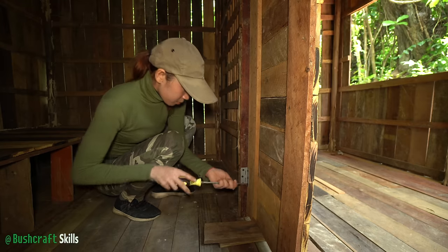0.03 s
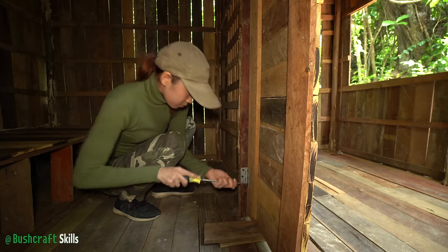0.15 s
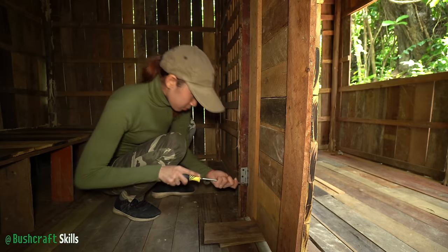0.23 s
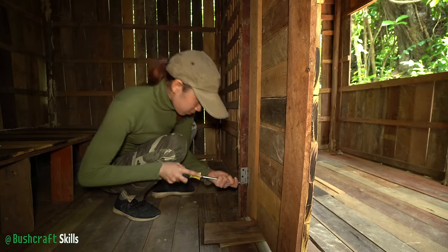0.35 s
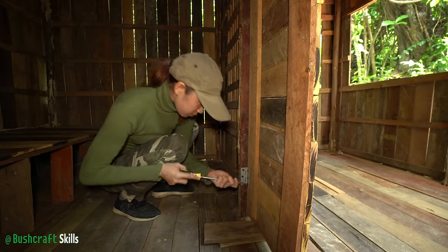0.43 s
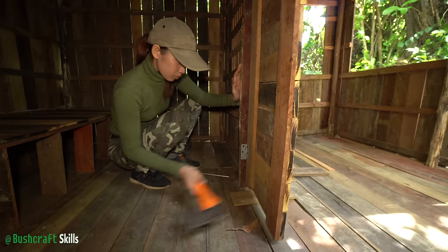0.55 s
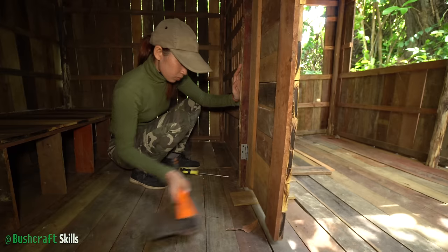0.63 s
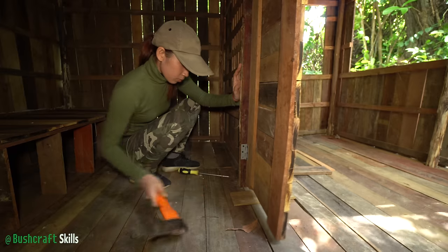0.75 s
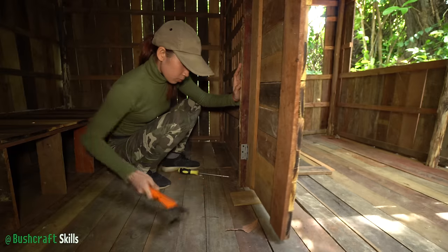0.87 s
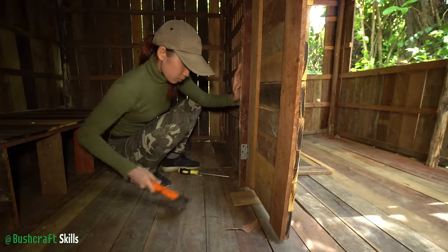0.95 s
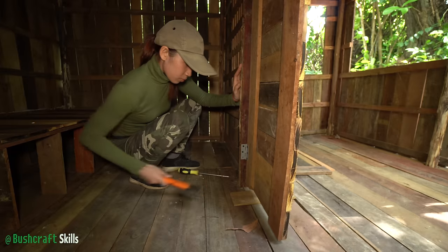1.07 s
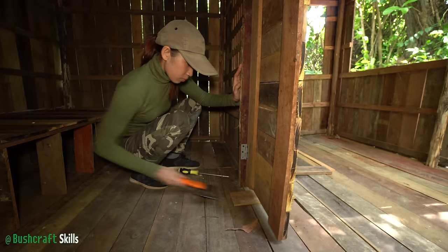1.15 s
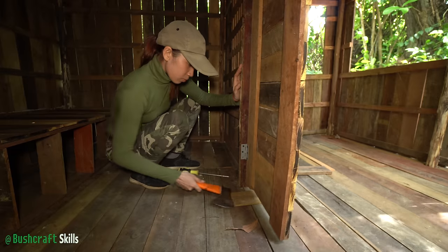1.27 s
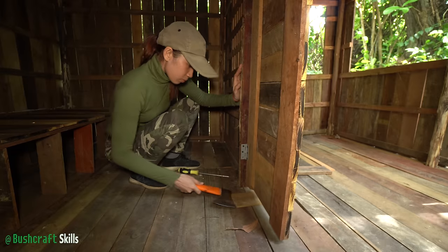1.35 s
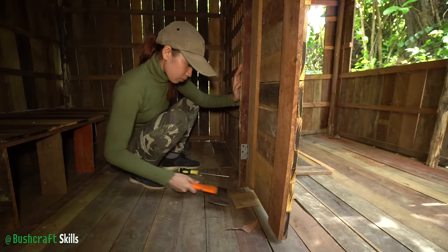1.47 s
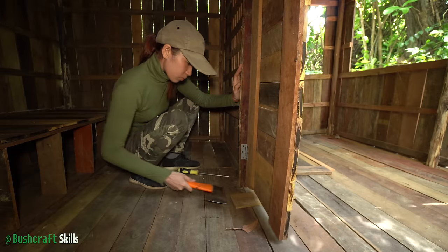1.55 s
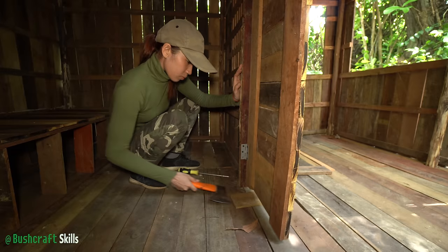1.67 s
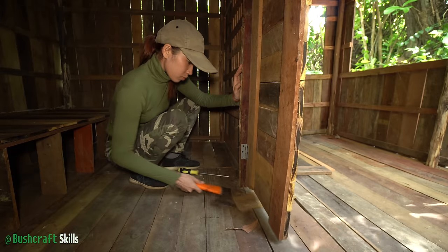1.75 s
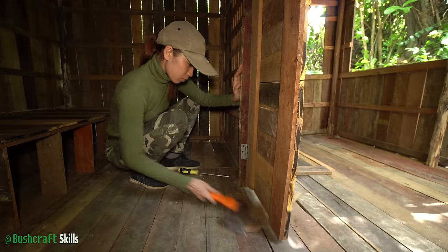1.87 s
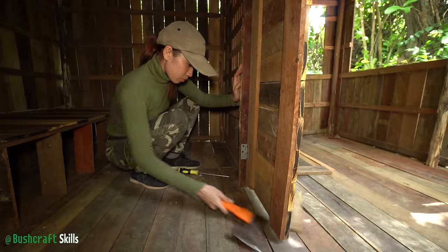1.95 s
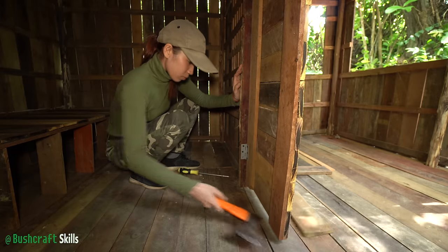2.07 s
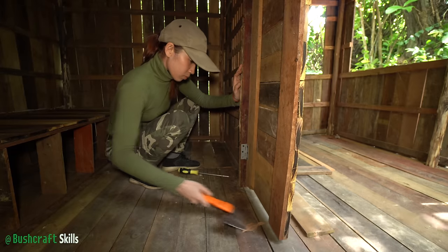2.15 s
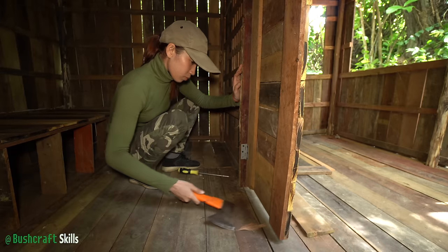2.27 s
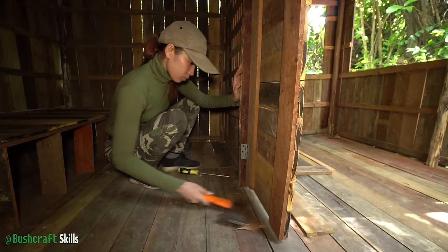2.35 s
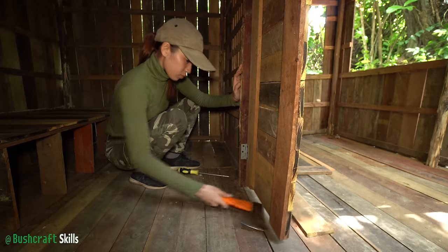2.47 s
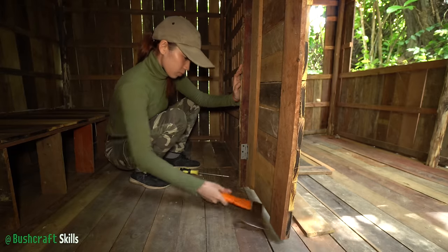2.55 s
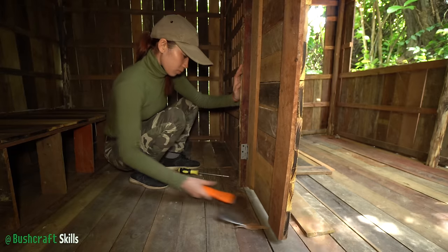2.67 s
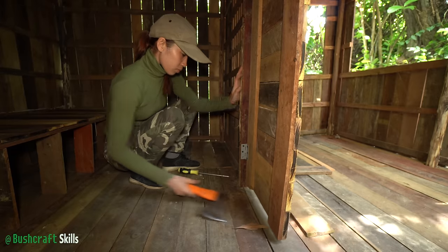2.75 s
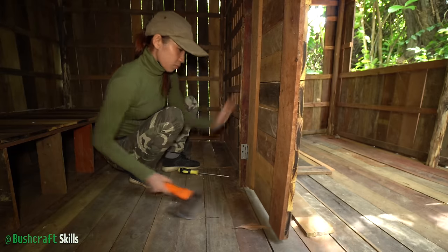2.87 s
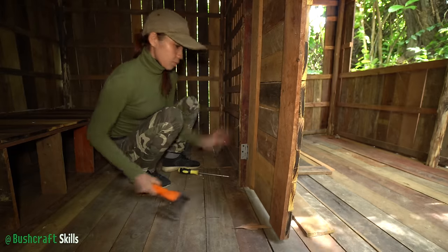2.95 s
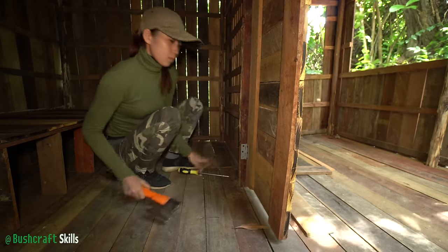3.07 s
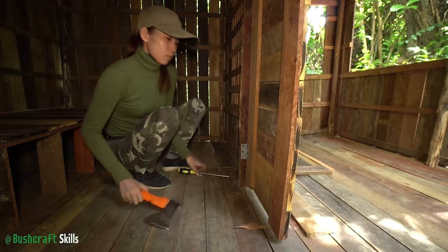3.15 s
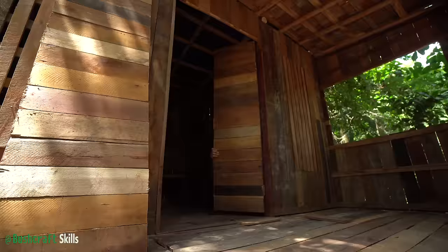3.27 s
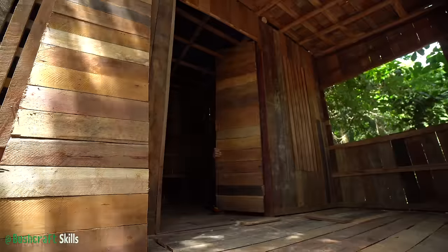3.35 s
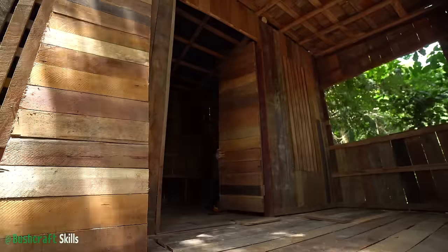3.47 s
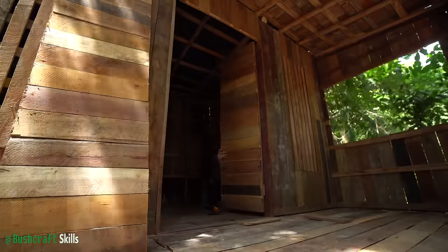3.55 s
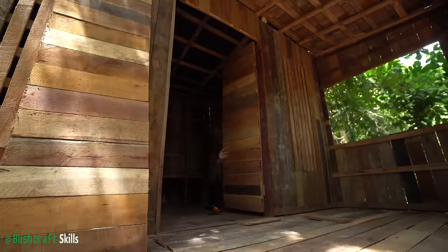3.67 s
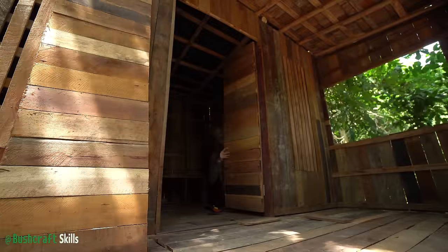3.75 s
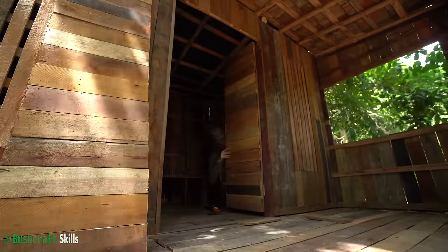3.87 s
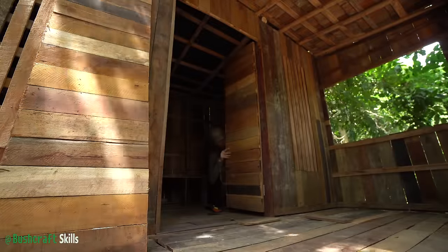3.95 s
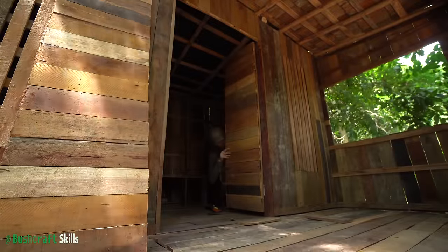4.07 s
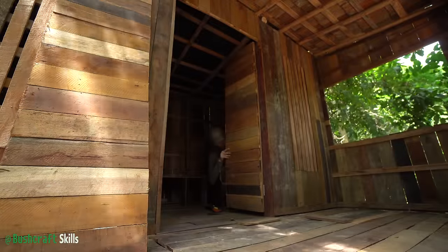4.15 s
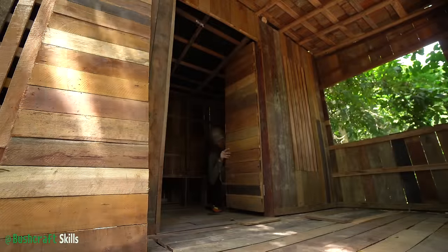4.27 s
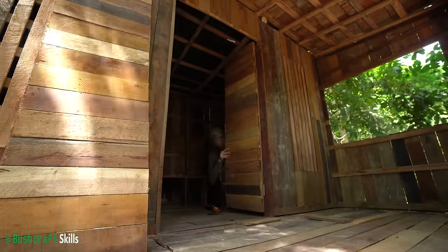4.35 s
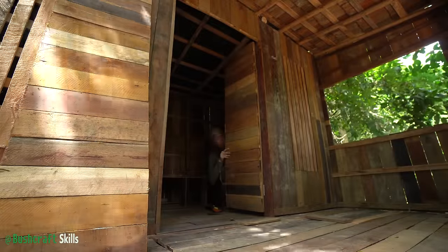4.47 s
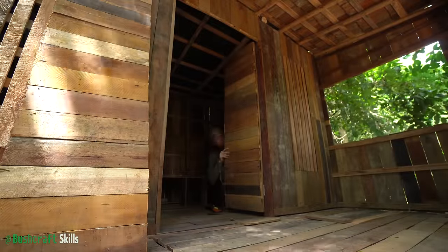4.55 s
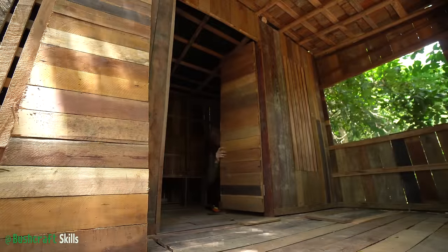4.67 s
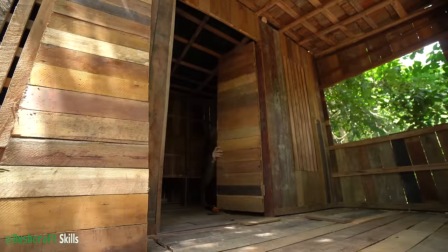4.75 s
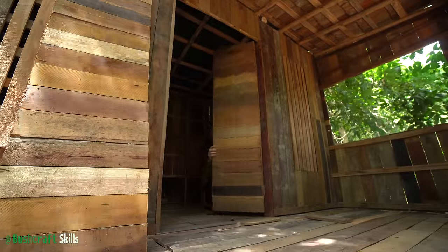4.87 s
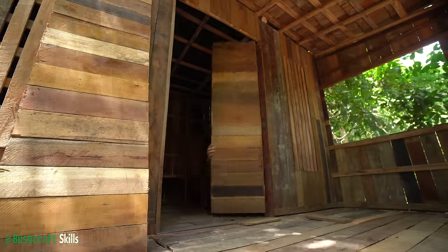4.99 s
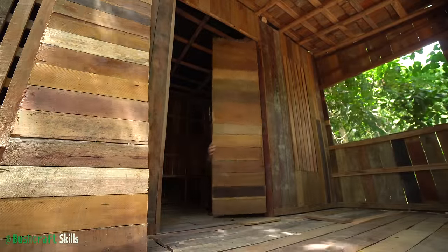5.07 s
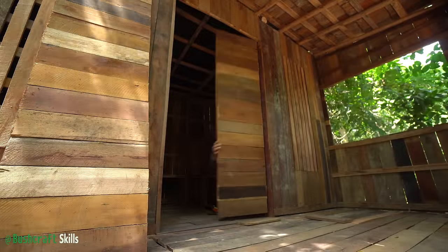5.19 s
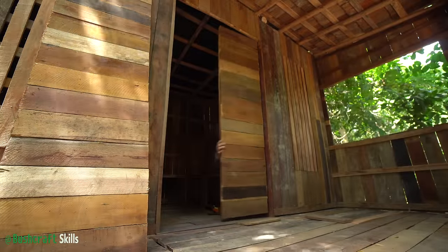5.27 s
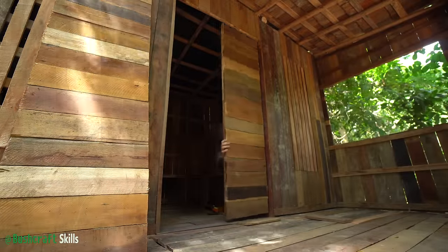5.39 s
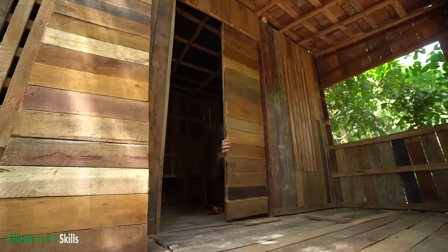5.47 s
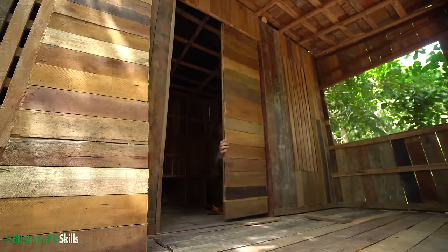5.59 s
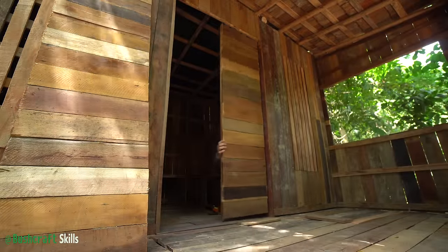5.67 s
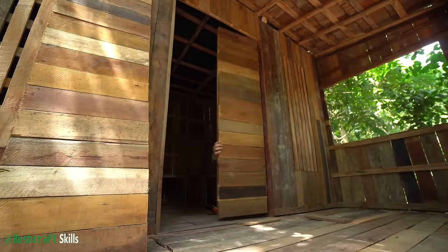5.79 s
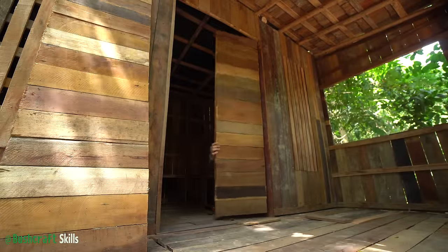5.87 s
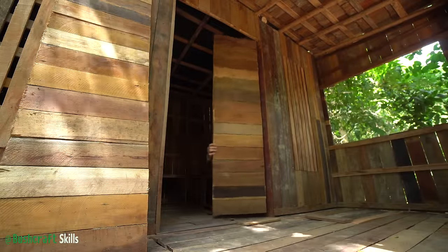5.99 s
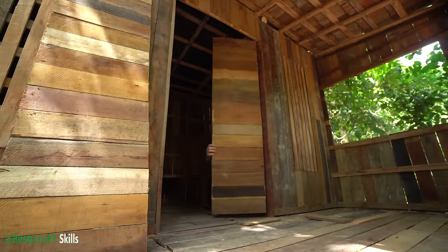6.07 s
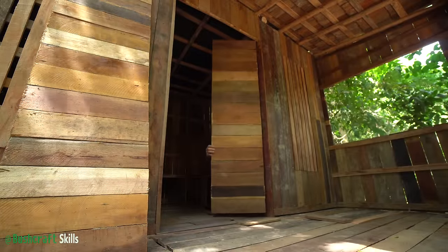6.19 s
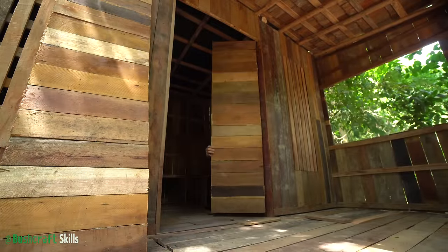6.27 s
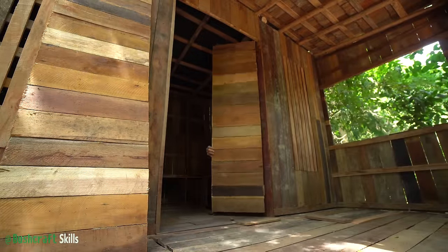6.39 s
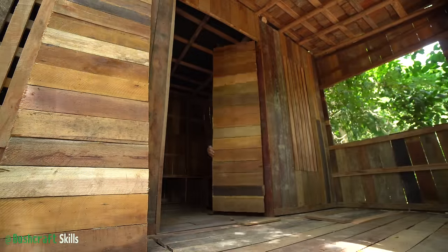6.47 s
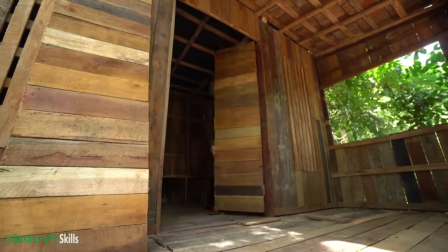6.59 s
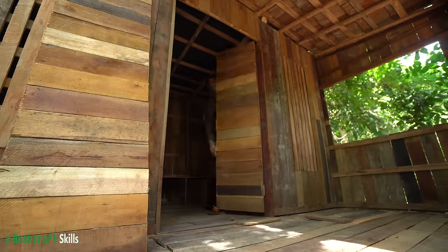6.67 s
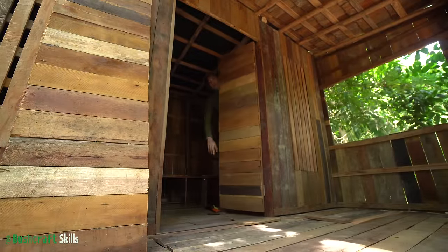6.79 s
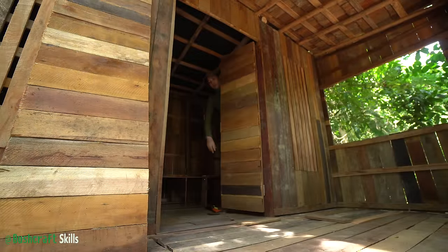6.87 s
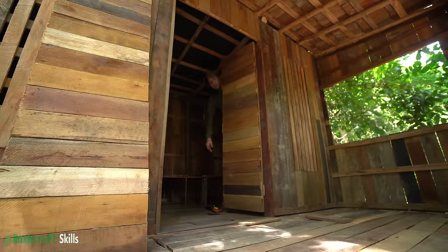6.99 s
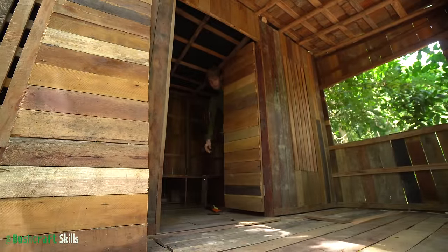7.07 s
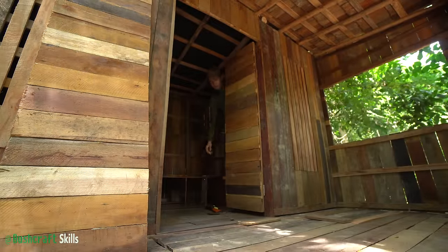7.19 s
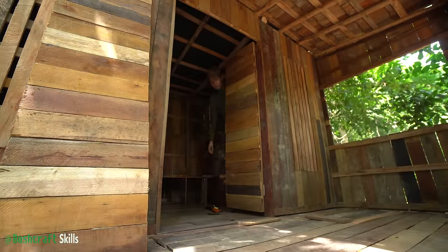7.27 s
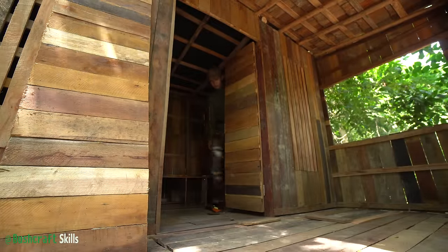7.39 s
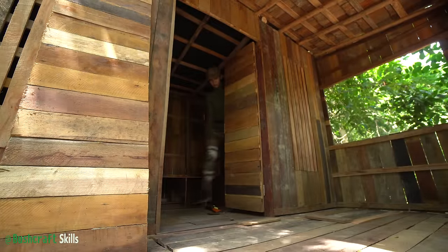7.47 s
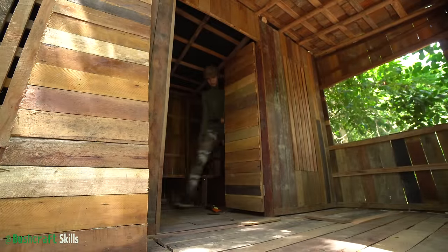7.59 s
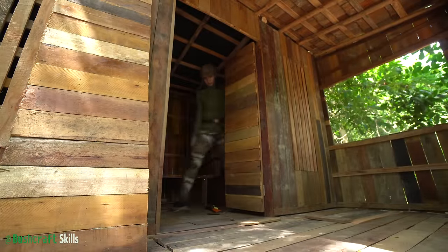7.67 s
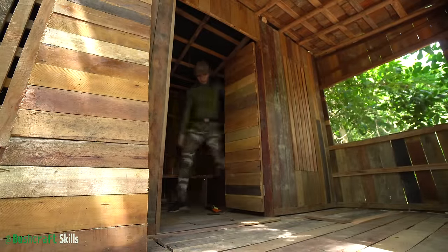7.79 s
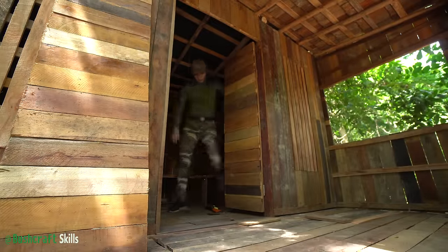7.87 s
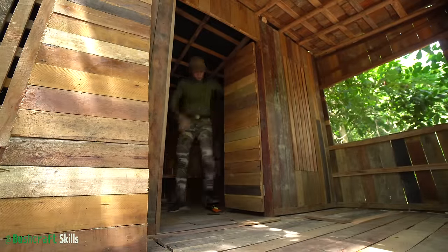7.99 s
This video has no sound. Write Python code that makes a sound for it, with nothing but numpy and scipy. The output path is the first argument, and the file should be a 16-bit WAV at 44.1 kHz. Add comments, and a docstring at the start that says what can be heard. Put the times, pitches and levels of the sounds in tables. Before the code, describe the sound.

Hatchet blows knock a wooden wedge under a door, with scraping and floor thuds, then steady leaf hiss, a door bump, hinge squeaks and shuffling feet.

```python
"""Inside a plank cabin in a forest, the background is louder for the first 0.42 s, then quickly fades under a
quieter one. A hatchet knocks a wedge from under a door: struck notes, plank modes and a dense ring make each
blow. Wedge and blade slide and bump on the floor boards as grainy noise with fine grit on top. Then the
microphone stands on the porch, where shaped noise hisses louder as leaves; the door bumps its post, the hinge
squeaks in wavering tones, and shuffling feet brush the wood in puffs of band noise."""
import sys
import numpy as np
from scipy import signal
from scipy.fft import rfft, irfft, next_fast_len
from scipy.io import wavfile
from scipy.ndimage import uniform_filter1d, map_coordinates

SR = 44100
rng = np.random.default_rng(int(sys.argv[2]) if len(sys.argv) > 2 else 0)


def file_out(sig):
    """Save sig as 16-bit WAV at sys.argv[1]."""
    # one column per channel
    cols = np.atleast_2d(sig).T
    # limit, then scale
    lim = np.clip(cols, -1, 1)
    pcm = np.round(lim * 32767).astype(np.int16)
    wavfile.write(sys.argv[1], SR, pcm)


N = 354546
T = np.arange(N) / SR
MOVE_S = 3.343  # the microphone goes from the room to the porch


def amp(db):
    """Turn decibels into a linear gain."""
    return 10 ** (np.asarray(db) / 20)


def unit(x):
    """Scale a signal to rms 1."""
    return x / np.sqrt(np.mean(x ** 2) + 1e-20)


def along(points, hz):
    """Read a curve of (Hz, value) points on a log frequency axis."""
    f, v = np.transpose(points)
    return np.interp(np.log(hz + 1), np.log(f + 1), v)


def closed(spectrum, lo_hz, hi_hz):
    """Give a spectrum steep ends."""
    return [(lo_hz, -80), *spectrum, (hi_hz, -80)]


def wobble(rate):
    """A smooth random curve, rate knots a second."""
    knots = rng.standard_normal(int(N * rate / SR) + 4)
    return map_coordinates(knots, [T * rate])


def stereo_noise(count, alike, gain, size=512):
    """Two noises whose likeness follows frequency, times gain(Hz, s) on the short-time spectrum."""
    hz, t, z = signal.stft(rng.standard_normal((2, count)), SR, nperseg=size)
    turn = np.arccos(np.clip(along(alike, hz), -1, 1))[:, None] / 2
    mid, side = z[0] * np.cos(turn), z[1] * np.sin(turn)
    shaped = np.array([mid + side, mid - side]) * gain(hz[:, None], t)
    return signal.istft(shaped, SR, nperseg=size)[1][:, :count]


def rush(spectrum, alike, patchy_db, dulling_db=0):
    """Noise of rms 1 with patches of random gain; its treble may drift, in dB a second at 10 kHz."""
    def gain(hz, t):
        field = rng.standard_normal((len(hz), len(t)))
        field = uniform_filter1d(uniform_filter1d(field, 20, 0), 4, 1)
        drift = dulling_db * hz / 10000 * (t - t[-1] / 2)
        return amp(along(spectrum, hz) + patchy_db * unit(field) + drift)
    return unit(stereo_noise(N, alike, gain, size=2048))


def stroke(start, length):
    """Progress 0-1 through a stroke, and seconds since its end."""
    done = np.clip((T - start) / length, 0, 1)
    after = np.maximum(T - start - length, 0)
    return done, after


# background levels, each from its start time: # from_s, rumble_level_db, hiss_level_db, hiss_drift_db_per_s
BACKGROUNDS = [(0, -45, -39.5, -2.5), (0.42, -48.5, -53, 2), (MOVE_S, -44.5, -33, -1.076)]
# relative colours of the leaf hiss, in the room and on the porch, and of the low air: pitch_hz, level_db per Hz
ROOM_HISS = [(120, -36), (200, -1), (359, -5), (599, -7.5), (803, -8.5), (946, -8), (3220, -11),
             (15800, -30)]
PORCH_HISS = [(120, -22), (200, -2), (359, 0.5), (464, -3), (588, -1.5), (848, -4), (3460, -2.5),
              (9300, -9.5), (15800, -15)]
RUMBLE = [(13, -39), (22, -3.5), (96, 1), (135, 1), (163, -7.5), (194, -6.5), (300, -23.5), (390, -29),
          (660, -120)]
# left-right likeness of far sound: pitch_hz, likeness (1 = same in both channels)
FAR_ALIKE = [(60, 1), (180, 1), (550, 0.87), (1650, 0.71), (4970, 0.14), (15000, 0.099)]
LINGER_DB_PER_S = 79  # the louder early background fades out under the quieter one that follows
DULLING_DB_PER_S = -.9  # at 10 kHz: on the porch the treble of the hiss sinks faster than the rest


def forest():
    """Far leaves hiss and the air rumbles; the walls dull the hiss in the room."""
    rumble_level, hiss_level = np.zeros(N), np.zeros(N)
    ends = [row[0] for row in BACKGROUNDS[1:]] + [N / SR]
    for (start, rumble_db, hiss_db, drift), end in zip(BACKGROUNDS, ends):
        fade = amp(-LINGER_DB_PER_S * np.maximum(T - end, 0))
        same_place = (T < MOVE_S) == (start < MOVE_S)
        here = (T >= start) * fade * same_place
        rumble_level += here * amp(rumble_db)
        hiss_level += here * amp(hiss_db + drift * (T - start))
    room = rush(closed(ROOM_HISS, 60, 20000), FAR_ALIKE, patchy_db=0.7)
    porch = rush(closed(PORCH_HISS, 60, 20000), FAR_ALIKE, patchy_db=1.0, dulling_db=DULLING_DB_PER_S)
    rumble = rumble_level * rush(RUMBLE, FAR_ALIKE, patchy_db=1.6)
    hiss = hiss_level * amp(0.23 * wobble(3.62)) * np.where(T < MOVE_S, room, porch)
    return (rumble + hiss) * amp([[.3], [-.3]])  # left, right


BLOOM_CYCLES = 1.33  # time constant of the swell, in cycles


def bloom(hz, t):
    """A wide plank takes some cycles to approach its full swing, so the bass comes late."""
    return 1 - np.exp(-t * hz / BLOOM_CYCLES)


def ring(t, hz, db, t60):
    """One mode of the wood: a sine that loses 60 dB in t60 seconds."""
    return amp(db - 60 * t / t60) * np.sin(2 * np.pi * hz * t)


# modes of floor, door and blade, before the scaling by piece and place: pitch_hz, level_db, t60_s
PLANKS = [(81.5, -4, 0.47), (151.4, 1.5, 0.33), (199.4, 1.5, 0.22), (330.6, -3.5, 0.28), (466, -8, 0.13),
          (839, -3.5, 0.077), (1084, -0.5, 0.069), (1390, -11, 0.059), (2980, -35, 0.049), (6700, -32, .2)]


def plank_modes(t, tilt, size, length):
    """The planks' modes ring with slightly random pitch, level and sign; smaller size is lower and longer."""
    total = 0
    for hz, level_db, t60 in PLANKS:
        sign = rng.choice([-1, 1])
        pitch_hz = size * hz * (1 + 0.027 * rng.normal())
        db = level_db + along(tilt, hz) + rng.normal(0, 3.2)
        mode = ring(t, pitch_hz, db, length * t60 / size ** 2)
        total = total + sign * mode * bloom(size * hz, t)
    return total


# dense ring of boards and walls, before the piece's length factor: pitch_hz, t60_s
RING = [(80, 0.89), (250, 0.3), (1000, 0.24), (3000, 0.21), (10000, 0.11)]
# relative colour of that ring: pitch_hz, level_db per Hz
RING_COLOUR = [(40, -28), (90, -9.5), (200, 2.5), (600, -6.5), (1500, -9), (3000, -12.5), (5000, -27.5),
               (9000, -40), (16000, -45)]
# left-right likeness of sound from the boards: pitch_hz, likeness (1 = same in both channels)
NEAR_ALIKE = [(100, 1), (500, 0.94), (1500, 0.73), (4000, 0.36)]


def dense_ring(t, tilt, notes_hz, length):
    """Crowded modes of boards and walls as noise that dies by band; the walls return the struck notes."""
    def gain(hz, u):
        bumps_db = 8 * sum(np.exp(-((hz - note) / (.11 * note)) ** 2) for note in notes_hz)
        decay_db = 60 * u / (length * along(RING, hz))
        db = along(RING_COLOUR, hz) + along(tilt, hz) + bumps_db - decay_db
        return bloom(hz, u + 0.0023) * amp(db)
    return stereo_noise(len(t), NEAR_ALIKE, gain)


# knocks on wood: start_s, piece, level_db, thud_db (weight of the bass), hardness_db (weight of the treble)
KNOCKS = [(0.543, "sill", -27.5, 0, -2.5), (0.569, "door", -30, -5, 0), (0.709, "sill", -43, 0, -3.5),
          (0.749, "board", -47.5, 7.5, -14), (0.931, "wedge", -35, -28, -8),
          (0.948, "sill", -42, -0.5, -15), (1.299, "wedge", -12, -17, -11),
          (1.315, "wedge", -10.5, -15.5, -9), (1.329, "sill", -14.5, -7, -15),
          (1.765, "post", -26.5, -1.5, -12.5), (1.782, "door", -28.5, -10, -17),
          (1.809, "board", -33.5, 7, -6), (1.83, "wedge", -14.5, -15, -17), (2.024, "board", -15, -7, -16),
          (2.075, "door", -19.5, -8, -13), (2.099, "board", -17.5, -19, -18),
          (2.164, "board", -18, -10.5, -32), (2.353, "door", -10.5, -11.5, -10.5),
          (2.426, "sill", -24, 2, -13), (2.482, "door", -27, -9, -9), (2.522, "block", -14.5, -0.5, -13.5),
          (2.542, "board", -16, -9, -33), (2.574, "sill", -9, -13.5, -10),
          (3.02, "block", -11.5, -14, -18.5), (3.037, "wedge", -31, -4, -28),
          (3.084, "block", -18, -23, -14), (3.143, "block", -24, 0, -11),
          (3.251, "handle", -8.5, -18, -16.5), (3.317, "handle", -18, -17, -16),
          (5.443, "post", -15.5, -14, -9.5), (7.782, "board", -26, -5.5, -5)]
# struck pieces by name: low_hz, mid_hz, high_hz, mid_level_db, ring_length (factor)
PIECES = {"wedge": (952, 1400, 2000, -24, 1.04), "door": (610, 1058, 1880, -8.5, 0.78),
          "board": (464, 762, 1880, -17, 0.9), "sill": (723, 1351, 2100, -11.5, 1.03),
          "block": (495, 1050, 2370, -11.5, 0.72), "post": (810, 1600, 2680, -14, 0.74),
          "handle": (638, 877, 1840, -5, 1.15)}


def knocks():
    """Each blow sounds the notes of the struck piece and the plank modes, over a dense ring."""
    out, t = np.zeros((2, N + SR)), np.arange(SR * 2 // 5) / SR
    for start, piece, level_db, thud_db, hard_db in KNOCKS:
        low_hz, mid_hz, high_hz, mid_db, length = PIECES[piece]
        # soft blows are low, hard ones bright
        tilt = [(150, thud_db + 13.5), (500, 0), (1300, 0), (2400, hard_db + 7.5)]
        size = 1 if start < MOVE_S else .8  # the free-swinging door is lower than the floor and rings longer
        modes = plank_modes(t, tilt, size, length)
        notes = ring(t, low_hz, -5.5, 0.067) + ring(t, mid_hz, mid_db, 0.091)
        notes += ring(t, high_hz, hard_db - 3.5, 0.037)
        crack = ring(t, 3780, hard_db - 2.5, 0.0038)
        dense = dense_ring(t, tilt, (low_hz, mid_hz, high_hz), length)
        sound = amp(-13.5) * modes + notes + crack + amp(7.5) * dense
        rise_s = 0.0018 * amp(0.63 * thud_db)  # soft, low contacts build up more slowly
        sound *= amp(level_db) * np.sin(np.pi / 2 * np.clip(t / rise_s, 0, 1)) ** 2
        if start < MOVE_S:
            sound *= start + t < MOVE_S  # room knocks stop at the move
        first = round(start * SR)
        out[:, first:first + len(t)] += sound
    return out[:, :N] * amp([[.4], [-.4]])  # left, right


# sliding on the boards, each fading in ahead of start_s:
# start_s, length_s, first_level_db, last_level_db, grit_db (over the slide, before its swell)
SLIDES = [(0.574, .18, -42, -47, -33), (1.332, 0.048, -38, -29, -29), (1.846, 0.17, -31, -24, -21),
          (2.084, 0.039, -33, -33.5, -22.5), (2.382, .03, -37, -35.5, -31), (2.512, 0.023, -38, -34, -17)]
# relative colours of the sliding boards and of the fine grit: pitch_hz, level_db per Hz
BOARD = [(40, -32), (200, 1.5), (600, -5), (1200, -7.5), (3000, -10), (5000, -22), (7000, -37)]
GRIT = [(3000, -20), (5000, 8), (9000, 5), (13000, 0.5), (16000, -13)]
SLIDE_RISE_S, SLIDE_STOP_DB_PER_S = 0.032, 236
GRIT_SWELL_DB = 5  # the grit swells at mid-stroke, where the slide is fastest


def slides():
    """Rough surfaces catch and slip: grainy noise in the boards, with fine grit on top."""
    body_level, grit_level = np.zeros(N), np.zeros(N)
    for start, length, first_db, last_db, grit_db in SLIDES:
        done, after = stroke(start, length)
        rise = np.clip(1 + (T - start) / SLIDE_RISE_S, 0, 1)
        level = rise * amp(first_db + (last_db - first_db) * done - SLIDE_STOP_DB_PER_S * after)
        body_level += level
        grit_level += level * amp(grit_db + GRIT_SWELL_DB * np.sin(np.pi * done))
    grain = amp(2.5 * wobble(400) + 1.2 * wobble(60))
    boards = unit(grain * rush(BOARD + [(12000, -80)], NEAR_ALIKE, patchy_db=2.5))
    grit = unit(grain * rush(closed(GRIT, 1500, 20000), NEAR_ALIKE, patchy_db=-1.0))
    return body_level * boards + grit_level * grit


# shoes and cloth brushing wood, each swelling for two half-rises up to start_s:
# start_s, level_db, centre_hz, width_octaves, half_rise_s, t60_s
SCUFFS = [(3.03, -46, 9000, 0.74, 0.0046, 0.087), (7.11, -33, 2080, 0.94, .015, 0.21),
          (7.198, -40, 12000, .4, .003, .15), (7.795, -30, 2200, 0.74, 0.0079, 0.17),
          (7.92, -42, 6000, 0.42, 0.027, .3), (7.945, -31.5, 3200, 1, 0.003, 0.19)]


def scuffs():
    """Short puffs of friction noise, each in one bell-shaped band."""
    out, t = np.zeros((2, N + SR)), np.arange(SR // 2) / SR
    for start, level_db, centre_hz, octaves, half_rise, t60 in SCUFFS:
        def band(hz, u):
            return np.exp(-.5 * (np.log2((hz + 1) / centre_hz) / octaves) ** 2) + 0 * u
        rise = 2 * half_rise
        shape = np.where(t < rise, (t / rise) ** 2, amp(-60 * (t - rise) / t60))
        first = round((start - rise) * SR)
        puff = unit(stereo_noise(len(t), NEAR_ALIKE, band))
        out[:, first:first + len(t)] += amp(level_db) * shape * puff
    return out[:, :N]


# hinge squeaks, each fading in ahead of start_s; pitches before the waver, level before flutter and walls:
# start_s, length_s, first_pitch_hz, last_pitch_hz, peak_level_db, end_waver_percent (of pitch)
SQUEAKS = [(5.549, 0.043, 5210, 5750, -31, 9.5), (5.715, 0.11, 4280, 4730, -33.5, 4),
           (5.945, .08, 5200, 6410, -33.5, 6), (5.975, .1, 3870, 5360, -29.5, 8),
           (6.216, .13, 4260, 4900, -34.5, 2.6)]
SQUEAK_SWELL_DB, SQUEAK_FALL_DB_PER_S = 1, 230  # swell for each % of waver; fall after the stroke
WAVER_START = .5  # share of the waver at the start


def hinge():
    """The pin sticks and slips: a wavering whistle with a rough upper band, smeared by the porch walls.
    Each squeak climbs, swells and roughens as the pin speeds up, then dies on its last pitch."""
    dry = np.zeros(N)
    slip, rattle, flutter = wobble(700), wobble(900), amp(2.5 * wobble(120))
    for start, length, first_hz, last_hz, peak_db, waver in SQUEAKS:
        done, after = stroke(start, length)
        hz = first_hz + (last_hz - first_hz) * done
        # rough squeaks swell most
        db = peak_db - SQUEAK_SWELL_DB * waver * (1 - done) - SQUEAK_FALL_DB_PER_S * after
        rough = waver / 100 * (WAVER_START + (1 - WAVER_START) * done)
        phase = 2 * np.pi * np.cumsum(hz * (1 + rough * slip)) / SR
        plate = amp(-10.5) * np.exp(-((2.7 * hz - 13300) / 1800) ** 2)  # loudest at a mode of the hinge plate
        upper = plate * np.sin(2.65 * phase + 1.6 * rattle)
        rise = np.clip(1 + (T - start) / 0.017, 0, 1)
        dry += amp(db) * flutter * rise * (np.sin(phase) + upper)
    walls = stereo_noise(SR // 4, [(1000, 0.063)], lambda hz, t: amp(-60 * t / 0.35 + 0 * hz), size=256)
    walls = walls / np.linalg.norm(walls[0])
    wet = signal.fftconvolve(dry[None], walls, axes=1)[:, :N]
    return amp([[-1.5], [-9]]) * dry + amp(-2.5) * wet  # the direct squeak leans left


def scene():
    """Sum the layers in the order they first sound."""
    return forest() + knocks() + slides() + scuffs() + hinge()


TOP_HZ = 15760  # band limit of the recorder


def record(dry):
    """The microphone loses the deepest bass; the recorder keeps nothing above its band limit."""
    m = next_fast_len(N + SR // 4)
    hz = np.fft.rfftfreq(m, 1 / SR)
    bass_cut = (1j * hz / (1j * hz + 28)) ** 2
    return irfft(rfft(dry, m) * bass_cut * (hz < TOP_HZ), m)[:, :N]


dry = scene()
out = record(dry)
file_out(out)
```